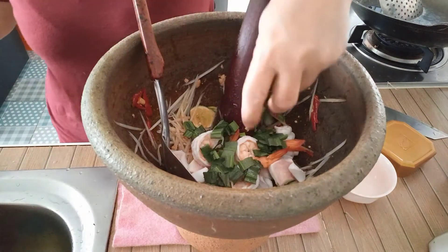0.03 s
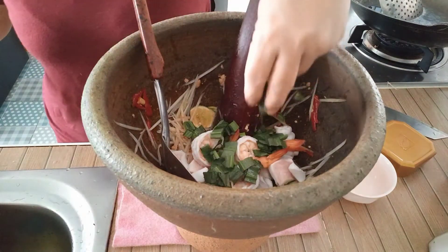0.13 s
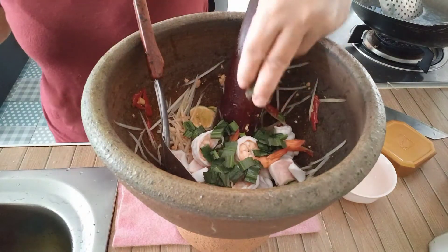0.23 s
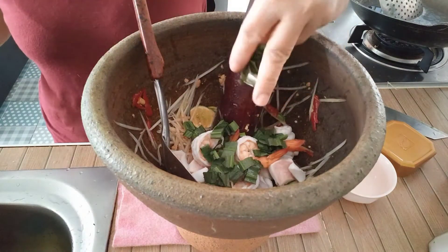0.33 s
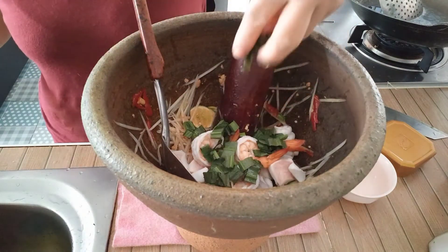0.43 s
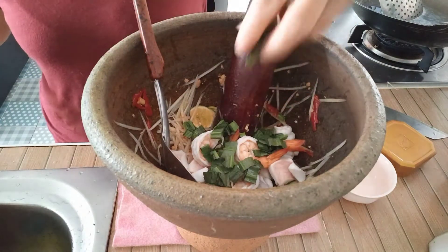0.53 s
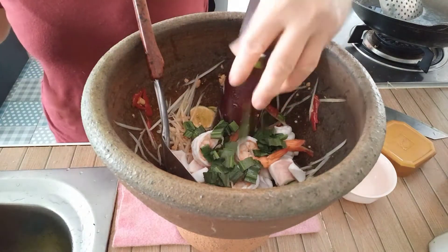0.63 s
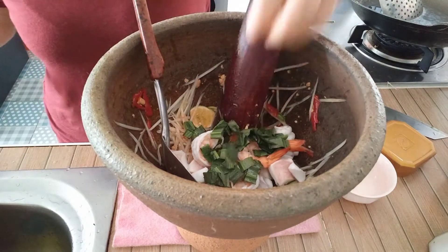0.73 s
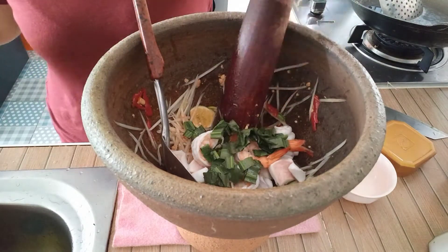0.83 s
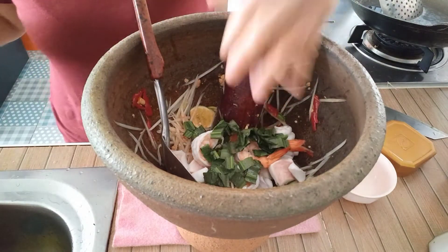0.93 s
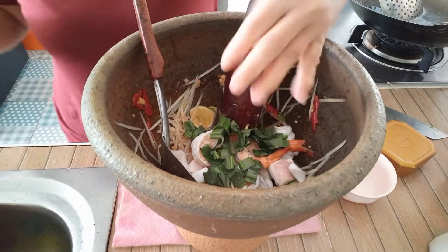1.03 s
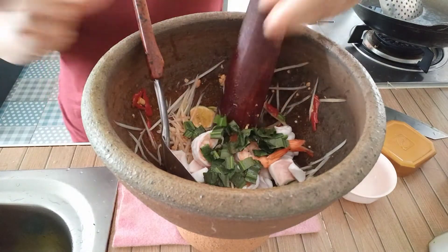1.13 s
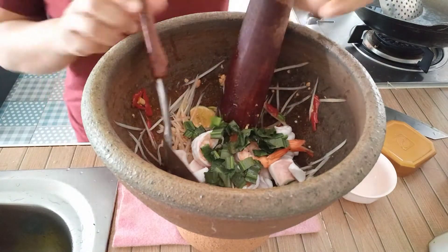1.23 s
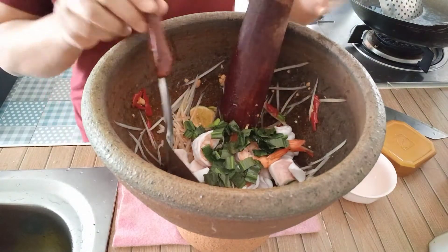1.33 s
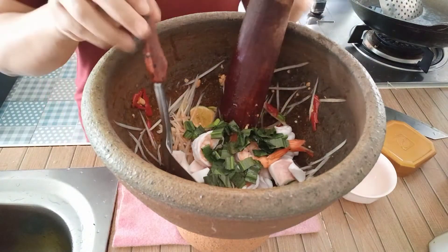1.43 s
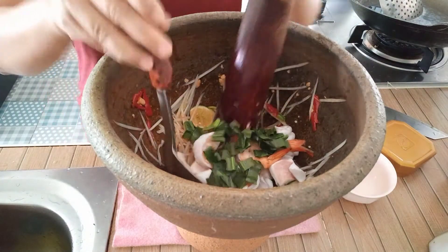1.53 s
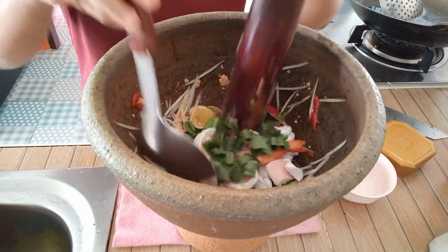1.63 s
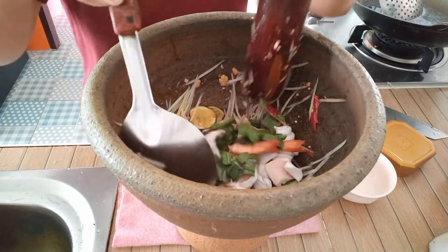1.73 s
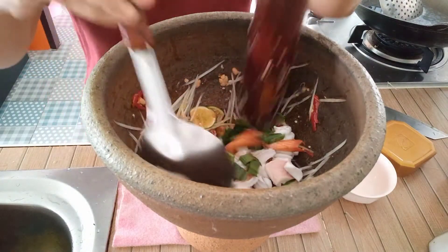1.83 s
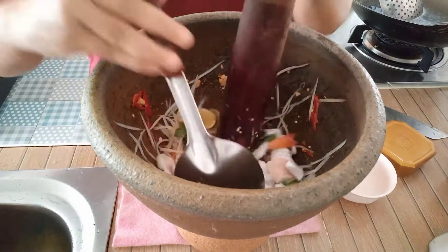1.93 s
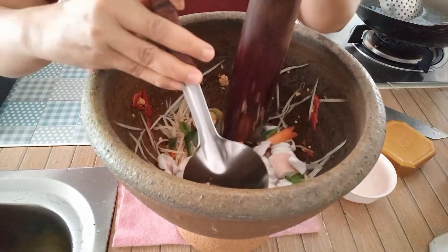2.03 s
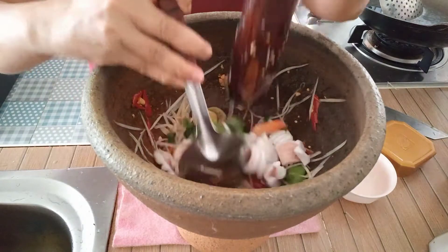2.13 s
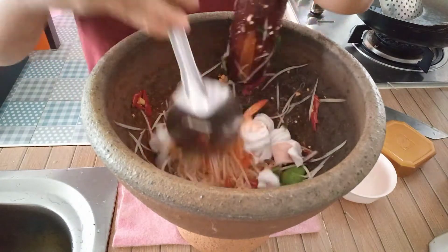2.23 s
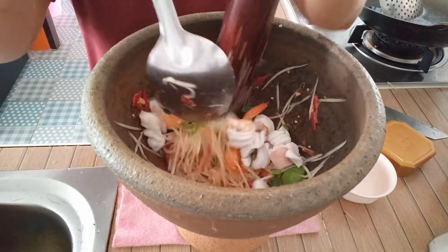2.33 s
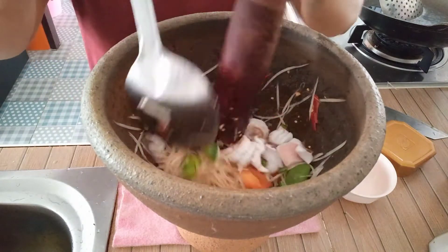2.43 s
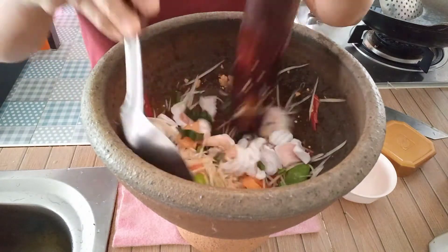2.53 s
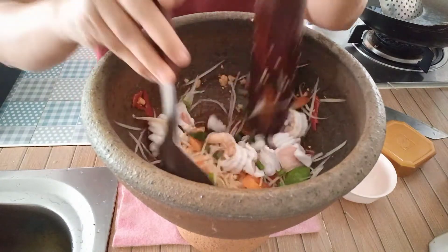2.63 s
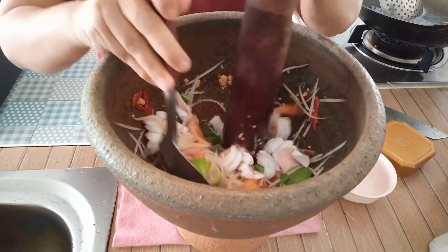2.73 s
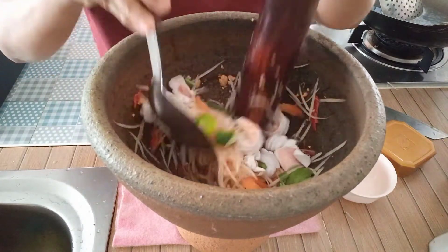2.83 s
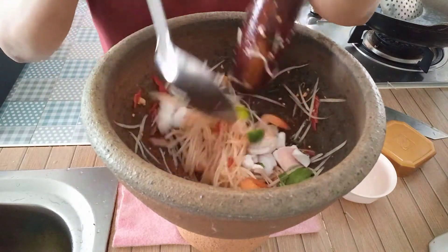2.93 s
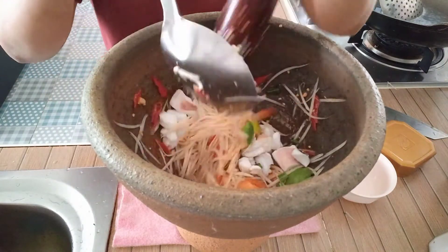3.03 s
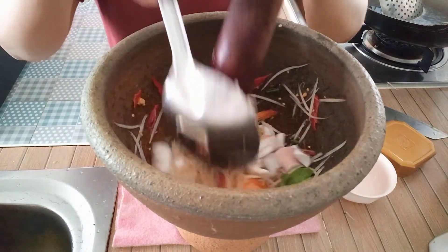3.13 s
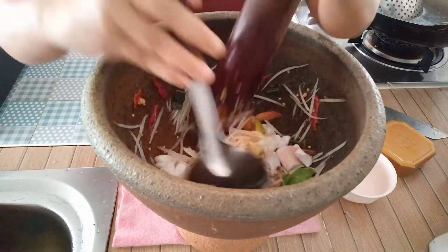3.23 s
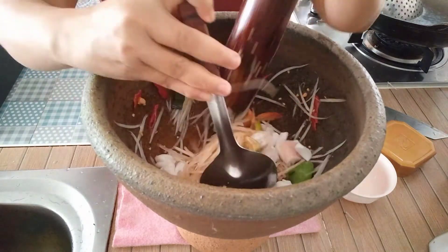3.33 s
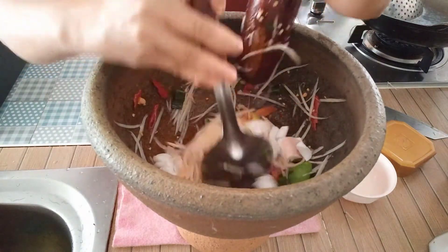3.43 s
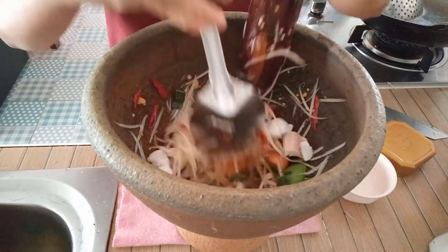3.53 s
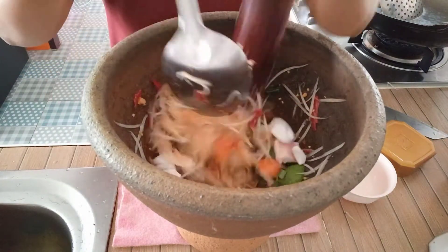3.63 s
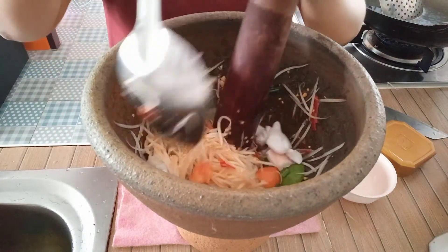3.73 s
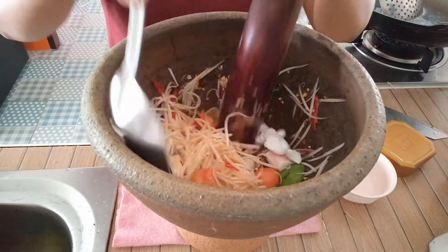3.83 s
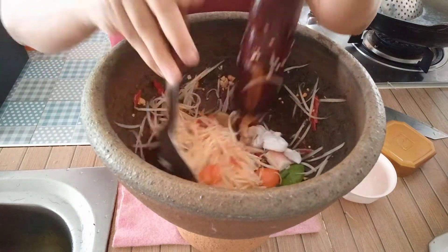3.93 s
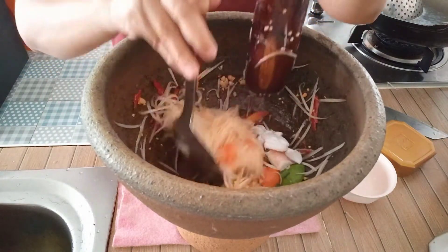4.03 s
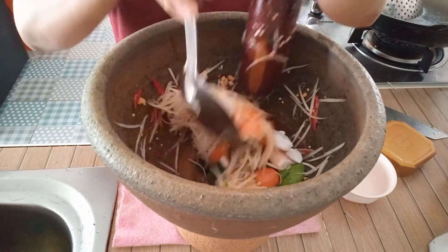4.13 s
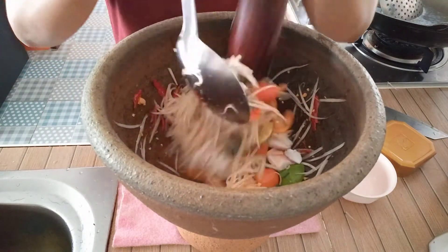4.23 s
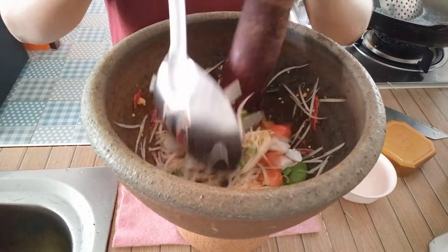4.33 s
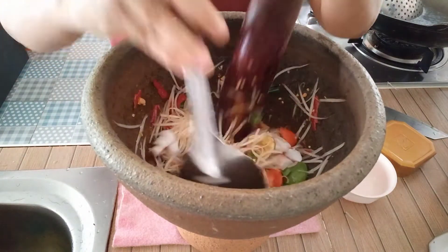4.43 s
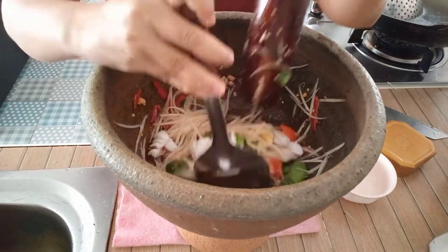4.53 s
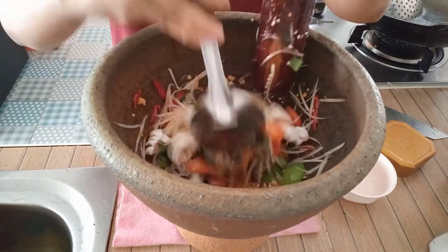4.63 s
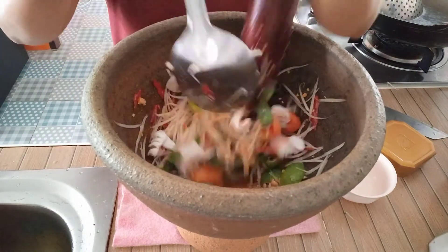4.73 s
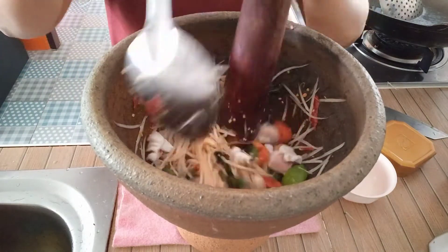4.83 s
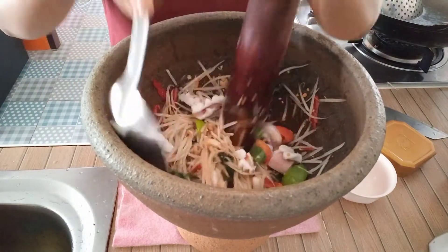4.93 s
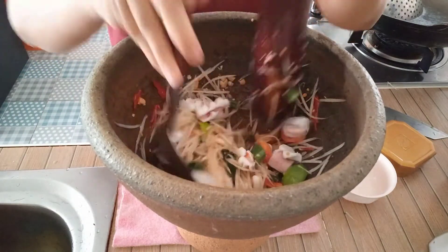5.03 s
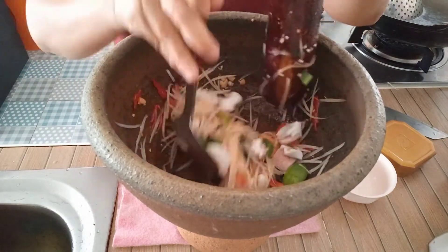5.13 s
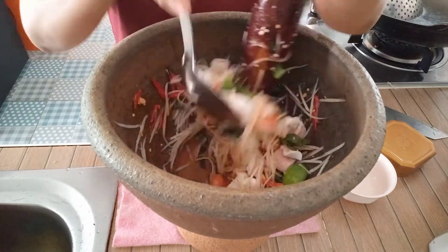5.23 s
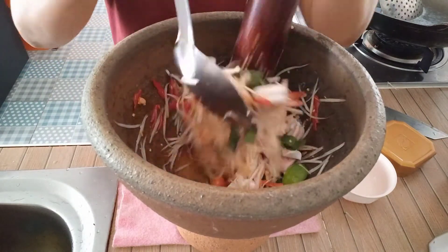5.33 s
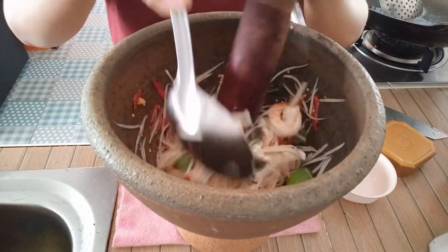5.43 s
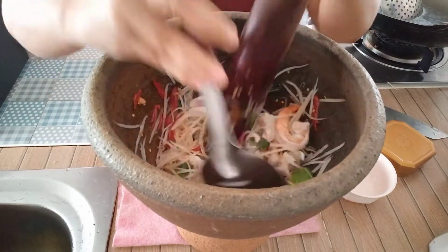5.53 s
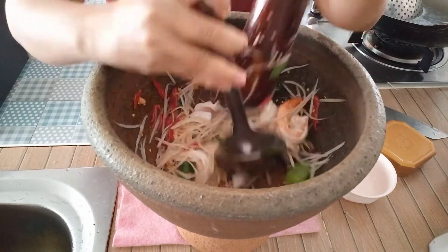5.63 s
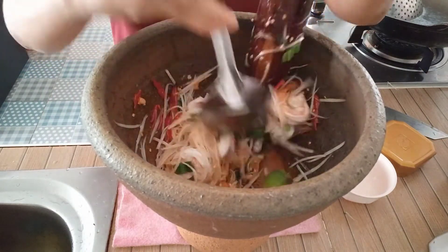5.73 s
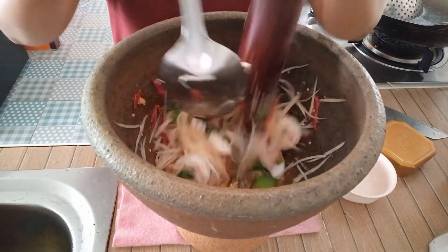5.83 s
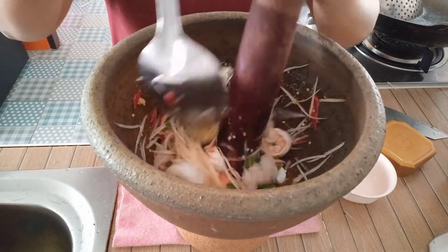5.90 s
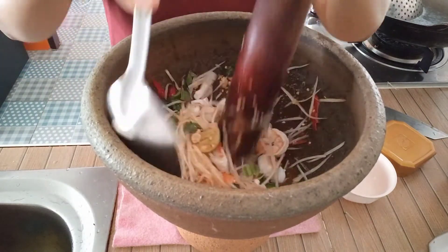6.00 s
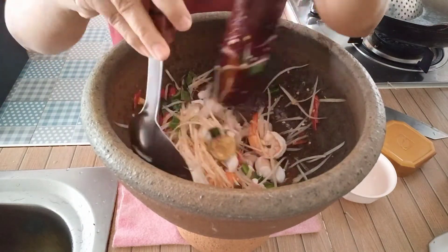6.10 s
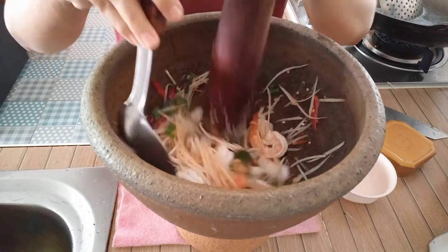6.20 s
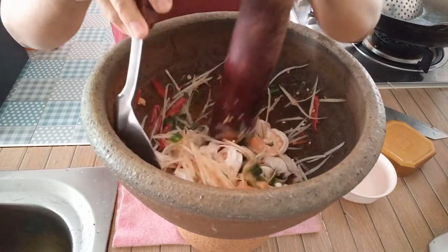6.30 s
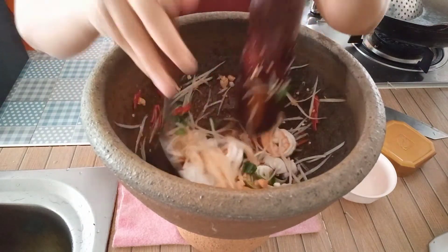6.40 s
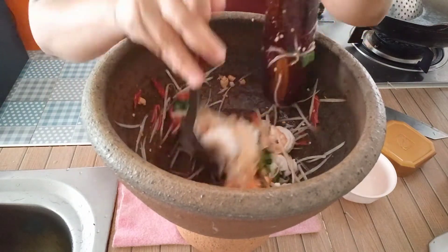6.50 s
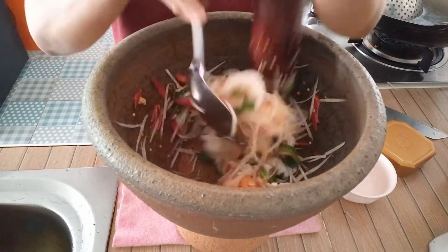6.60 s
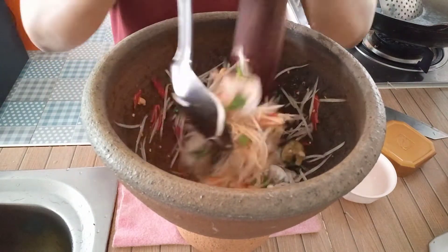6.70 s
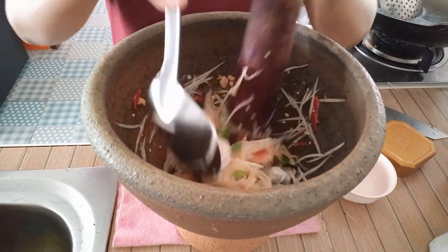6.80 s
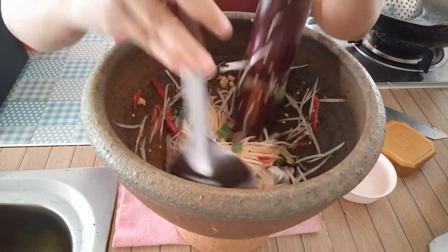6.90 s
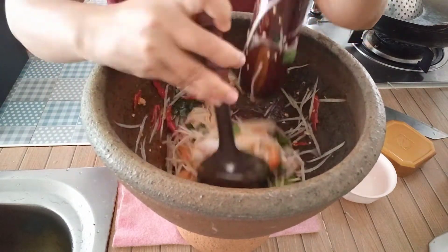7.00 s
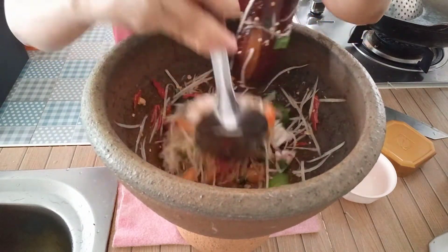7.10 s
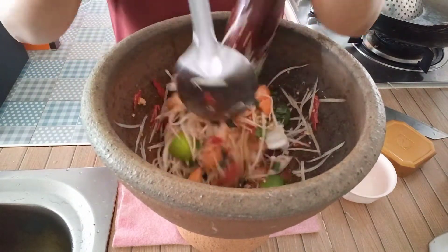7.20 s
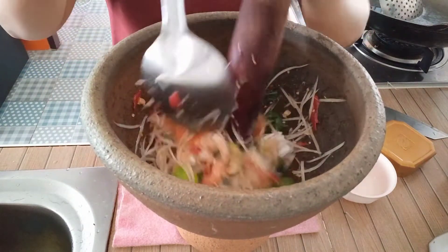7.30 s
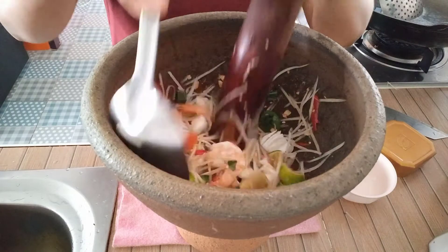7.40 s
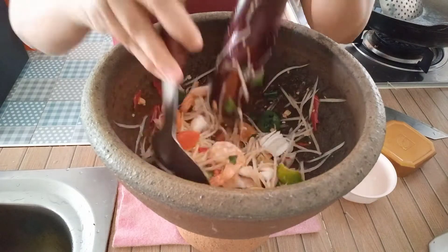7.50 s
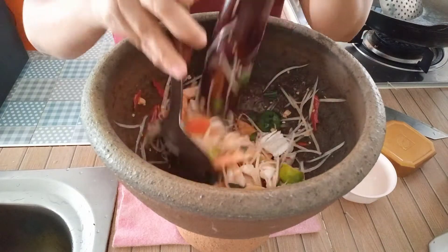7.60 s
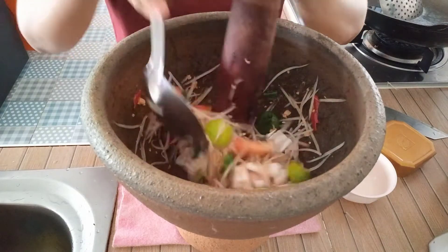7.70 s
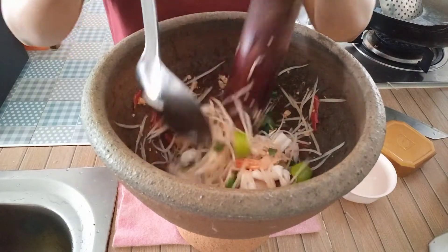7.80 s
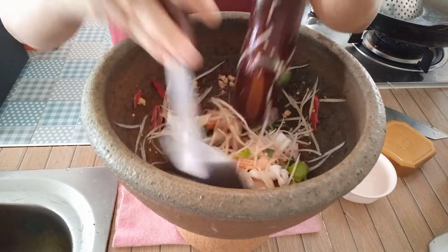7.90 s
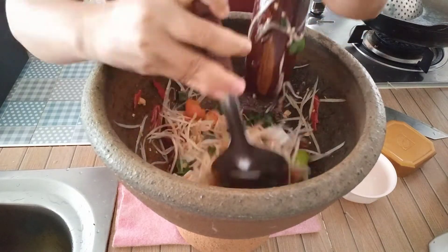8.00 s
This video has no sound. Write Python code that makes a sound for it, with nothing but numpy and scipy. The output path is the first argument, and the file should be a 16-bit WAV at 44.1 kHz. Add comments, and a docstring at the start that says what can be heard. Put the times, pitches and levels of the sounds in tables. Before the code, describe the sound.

Close, quick salad pounding: dull wooden blows, hollow clay ring, bright spoon clinks, gritty scrapes and moist squelches, after a few distant knocks.

```python
"""Dull wooden thuds and a ringing clay bowl, close by: a salad is mixed in a big mortar in a small kitchen.
The pestle lands as filtered bursts of echoes and the bowl rings in paired modes; between blows a steel spoon
clinks, scrapes in stick-slip grains and turns the food over, which crackles and squelches. The counter booms
underneath as swelling low noise. At the start something knocks farther off; faint whistles glide far away."""
import sys
import numpy as np
from scipy import signal
from scipy.fft import rfft, irfft
from scipy.io import wavfile
from scipy.ndimage import uniform_filter1d

SR = 44100
rng = np.random.default_rng(int(sys.argv[2]) if len(sys.argv) > 2 else 0)


def int16_out(signal):
    """Quantize to a 16-bit WAV file."""
    q = np.round(np.clip(np.atleast_2d(signal).T, -1, 1) * 32767)
    wavfile.write(sys.argv[1], SR, q.astype(np.int16))


N = 355181
TAIL = SR // 3   # longest response in samples

# Pestle blows. Each row: start in seconds, bowl ring in dB, thud in dB.
BLOWS = [(2.257, -57.5, -60), (2.352, -31.5, -29), (2.366, -35.5, -31.5), (2.625, -33, -25.5),
         (2.66, -40, -24.5), (3.039, -34.5, -40), (3.081, -26, -25.5), (3.143, -34, -23),
         (3.432, -74, -57.5), (3.582, -56.5, -47), (4.143, -50.5, -61), (4.173, -44.5, -42),
         (4.634, -29.5, -39), (4.676, -37.5, -36.5), (4.897, -38, -30), (5.214, -35.5, -43),
         (5.245, -49, -43), (5.32, -25, -26.5), (5.357, -28.5, -28.5), (5.491, -51, -33.5),
         (5.732, -28, -35.5), (6.368, -49, -45.5), (6.538, -14, -28), (7.166, -54.5, -55)]
# The spoon meets the wall. Each row: start in seconds, bowl ring in dB, force in dB before colouring,
# blade pitch in Hz, chatter t60 in seconds.
CLINKS = [(1.013, -79.5, -71.5, 2470, 0.063), (1.289, -83.5, -70, 2940, 0.13),
          (1.745, -40.5, -32, 1666, 0.052), (1.762, -38.5, -34.5, 1630, 0.049),
          (1.959, -42, -39, 1645, 0.21), (2.256, -67.5, -51.5, 2940, .14), (2.5, -27.5, -18, 5050, 0.034),
          (2.968, -86, -58.5, 6530, .06), (3.432, -51, -51.5, 3780, 0.054),
          (3.772, -36.5, -17.5, 5370, 0.04), (3.787, -27.5, -19.5, 2960, 0.083),
          (3.847, -34.5, -16.5, 2673, 0.052), (4.19, -60, -42.5, 5420, 0.1), (4.248, -71, -40, 1360, .05),
          (4.402, -38, -19, 2555, 0.068), (4.877, -27.5, -18.5, 2980, 0.084),
          (4.933, -55, -19, 4760, 0.078), (4.942, -32.5, -17, 4930, .05), (5.038, -64, -18.5, 1950, 0.048),
          (5.491, -55, -24, 2530, 0.057), (5.99, -28.5, -24, 3770, .08), (6.152, -55, -42.5, 3190, 0.05),
          (7.395, -36, -24.5, 3880, 0.042), (7.506, -67, -24.5, 1637, 0.028), (7.897, -40, -26, 2370, 0.21),
          (7.914, -38, -23.5, 6680, 0.076), (7.946, -45, -15, 2654, 0.057)]
# The spoon drags over the clay. Each row: start in seconds, length in seconds,
# force in dB before colouring, blade pitch in Hz.
SCRAPES = [(1.771, 0.089, -38.5, 4640), (1.862, .06, -38.5, 1830), (1.955, 0.017, -33, 1677),
           (2.031, 0.021, -32.5, 2610), (2.045, 0.036, -29, 4210), (2.502, 0.033, -20.5, 4850),
           (2.542, 0.021, -27, 2910), (2.558, 0.056, -20, 2696), (2.611, 0.025, -18, 1635),
           (2.64, 0.034, -28, 1560), (2.669, .04, -37.5, 2065), (3.792, 0.021, -26, 1640),
           (4.885, 0.059, -33.5, 2870), (4.946, 0.05, -17, 2920), (4.99, .038, -24.5, 1950),
           (5.996, 0.047, -21.5, 2910), (6.04, 0.0392, -34.5, 1606), (6.207, 0.062, -32.5, 1560),
           (6.336, 0.057, -41, 1533), (6.396, 0.021, -28.5, 4610), (7.392, 0.044, -25, 3280),
           (7.442, 0.029, -21.5, 4560), (7.454, .025, -23, 1623), (7.494, 0.021, -29, 1660),
           (7.944, .03, -21, 1986)]
# Wet food is pressed or turned. Each row: start in seconds, length in seconds, squelch in dB,
# hiss in dB, counter boom in dB.
PUSHES = [(1.274, 0.08, -69, -65, -76.5), (1.415, 0.18, -71.5, -62.5, -80), (1.76, 0.25, -46, -41.5, -52.5),
          (2.316, 0.12, -36.5, -35.5, -33), (2.65, 0.18, -48.5, -47.5, -46.5),
          (3.062, .13, -38, -36.5, -37), (3.213, 0.11, -51.5, -45, -57), (3.569, .16, -33.5, -32, -39),
          (4.174, .14, -37, -41, -40), (4.415, 0.11, -31, -30, -47), (4.69, .17, -35, -38.5, -36),
          (5.225, 0.1, -58, -50, -49), (5.317, 0.12, -37.5, -37.5, -36), (5.5, 0.13, -39.5, -39.5, -45),
          (5.773, 0.13, -34.5, -38, -48), (6.116, 0.14, -44.5, -41, -60.5), (6.255, 0.1, -41, -78, -56.5),
          (6.408, 0.1, -43, -44.5, -54), (6.57, 0.083, -50, -44.5, -53), (6.63, 0.11, -37, -40, -45.5),
          (6.855, .13, -53.5, -41.5, -55), (6.958, 0.077, -51.5, -50.5, -56), (7.174, .17, -38, -39, -50.5),
          (7.62, 0.089, -34.5, -38, -58)]
# Something is set down farther off. Each row: start in seconds, level in dB before colouring,
# brightness in dB per band.
KNOCKS = [(0.153, -31, 0.5), (.347, -19, -1), (0.526, -40.5, -1), (.575, -27, -2.5), (0.614, -32.5, -2.5),
          (.651, -35, -5.5), (.674, -62, -6.5)]
# Smooth spectrum of spoon and wall. Each row: frequency in Hz, level in dB.
SPOON_SPECTRUM = [(100, -28.5), (280, -8), (500, -5.5), (1200, -5.5), (2000, -1), (2700, 3), (4500, 3),
                  (6600, -1.5), (7600, -13.5), (8800, -10.5), (12000, -7.5), (16000, -14.5)]
# Resonances of spoon and wall. Each row: frequency in Hz, width in Hz, height in dB.
SPOON_PEAKS = [(477.5, 32, 13.6), (744, 13, 15), (976, 89, 14.4), (1509, 130, 7.9), (1599, 43, 17),
               (1972, 29, 8.7), (2380, 9.9, 3.6), (2480, 54, 2.7), (2650, 17, 1.7), (2944, 33, 6),
               (3560, 11, 1.3), (3720, 9.7, 3.2), (4570, 120, 5.9), (4680, 15, 4), (6430, 810, 1.1)]
# Low, mid, high and top band of a contact. Each row: lower edge in Hz, upper edge in Hz.
BANDS_HZ = [(40, 760), (760, 2300), (2300, 7200), (7200, 19000)]


def from_db(db):
    """Turn decibels into an amplitude factor."""
    return 10 ** (np.asarray(db) / 20)


def dying(t60):
    """Envelope that falls 60 dB in t60 seconds."""
    return from_db(-60 * np.arange(TAIL) / SR / t60)


def cut(x, hz, kind, order=4):
    """Butterworth filter."""
    return signal.sosfilt(signal.butter(order, hz, kind, fs=SR, output="sos"), x)


def resonate(x, hz, width_hz):
    """Pass a signal through one narrow resonance."""
    b, a = signal.iirpeak(hz, hz / width_hz, fs=SR)
    return signal.lfilter(b, a, x)


def convolve(x, response):
    """Pass a signal through a mono or stereo response."""
    return signal.fftconvolve(np.atleast_2d(x), response, axes=1)


def add(out, s, x):
    """Mix a sound in at time s in seconds."""
    at = round(s * SR)
    out[:, at:at + x.shape[1]] += x[:, :max(N - at, 0)]


def at_level(x, db):
    """Scale a sound so that its loudest hundredth of a second has this rms level."""
    power = uniform_filter1d(np.mean(x ** 2, axis=0), SR // 100)
    return x * from_db(db) / np.sqrt(power.max() + 1e-20)


def stereo_noise(size, alike):
    """Two white noises with a common part; alike is their correlation."""
    mid, side = rng.standard_normal((2, size))
    common = np.sqrt(1 + alike) * mid
    opposite = np.sqrt(1 - alike) * side * [[1], [-1]]
    return (common + opposite) / np.sqrt(2)


def body(spectrum, peaks=(), size=4096):
    """Causal (minimum-phase) impulse response of a smooth spectrum with resonances on top."""
    hz = np.maximum(np.fft.rfftfreq(size, 1 / SR), 1)
    points, db = np.transpose(spectrum)
    smooth = from_db(np.interp(np.log(hz), np.log(points), db))
    lift = 1 + sum(from_db(height) ** 2 / (1 + (2 * (hz - centre) / width) ** 2)
                   for centre, width, height in peaks)
    # folding the cepstrum forward makes the response causal
    cepstrum = irfft(np.log(smooth * np.sqrt(lift)))
    cepstrum[1:size // 2] *= 2
    cepstrum[size // 2 + 1:] = 0
    return irfft(np.exp(rfft(cepstrum)))[None]


def scatter(t60, direct_db, alike):
    """A direct click, right ear first, with dense reflections of unit energy."""
    ear_lag = 6   # samples
    echoes = stereo_noise(TAIL, alike) * dying(t60)
    echoes /= np.sqrt(np.sum(echoes ** 2) / 2)
    echoes[[0, 1], [ear_lag, 0]] += from_db(direct_db)
    return echoes


def voiced(x, levels_db):
    """Each contact weights the low, mid, high and top bands in its own way."""
    return sum(at_level(cut(x, band, "band", order=3), db) for band, db in zip(BANDS_HZ, levels_db))


def grains(size, per_s, spread_db):
    """Random clicks of uneven strength and sign."""
    out = np.zeros(size)
    at, strength, sign = rng.random((round(size * per_s / SR), 3)).T
    loudness = from_db(-spread_db * np.log(np.maximum(strength, .02)))
    out[(at * size).astype(int)] = loudness * np.sign(sign - .5)
    return out


def steady(spectrum, alike, peaks=()):
    """Coloured stereo noise, rms 1."""
    x = convolve(stereo_noise(N + TAIL, alike), body(spectrum, peaks))[:, TAIL:TAIL + N]
    return x / x.std()


def aftermath(jolts, rise_s, t60):
    """Power that swells and dies away after each jolt, given as start in seconds and peak in dB."""
    out, t = np.zeros((1, N)), np.arange(SR) / SR
    shape = (1 - np.exp(-t / rise_s)) * np.exp(-np.log(1000) * t / t60)
    for s, db in jolts:
        add(out, s, (from_db(db) * shape[None] / shape.max()) ** 2)
    return out[0]


def pestle(thud_db=0, clack_db=-5, clack_follows_ring=0.51):
    """Wood lands on food and clay: a dull thud and a short clack, more clack when the clay rings more."""
    # Plain colour of wood on food. Each row: frequency in Hz, level in dB.
    thud_spectrum = [(60, -27.5), (120, -6), (190, -8.5), (300, -8), (600, 1), (1100, -2), (1400, -16),
                     (2500, -22.5), (6000, -33), (16000, -53.5)]
    # Resonances of the thud. Each row: frequency in Hz, width in Hz, height in dB.
    thud_peaks = [(284.7, 30, 16.5), (393, 16, 9), (475.7, 32, 14.5), (530, 19, 11), (1020, 32, 7)]
    out, wood = np.zeros((2, N)), body(thud_spectrum, thud_peaks)
    for s, ring, thud in BLOWS:
        low = convolve(scatter(t60=0.12, direct_db=-6.5, alike=0.92), wood)
        high = convolve(scatter(t60=0.09, direct_db=-12.5, alike=0.29), wood)
        clack = thud + clack_db + clack_follows_ring * (ring - thud)
        add(out, s, at_level(cut(low, 810, "low"), thud + thud_db))
        add(out, s, at_level(cut(high, 880, "high"), clack))
    return out


def ringing(pestle_db=0, spoon_db=0):
    """The clay rings after every blow: dull under wood, bright under steel."""
    out = np.zeros((2, N))
    dull = bowl(pestle_db, contact_hz=1480, rise_s=0.0077)
    bright = bowl(spoon_db, contact_hz=5500, rise_s=0.0039)
    for table, ring in (BLOWS, dull), (CLINKS, bright):
        for s, ring_db, *_ in table:
            add(out, s, from_db(ring_db) * ring)
    return out


def bowl(ring_db, contact_hz, rise_s, split_hz=11, swell_db=4, opposed=0.58, right_lag_rad=1.4):
    """Each wall mode is a close pair that starts opposed, so the ring swells, dips and returns faintly."""
    # Wall modes of the mortar. Each row: frequency in Hz, relative level in dB, t60 in seconds,
    # right ear gain in dB.
    bowl_modes = [(737, 12.5, 0.17, 0.5), (1668, -7.5, 0.17, -2), (2540, -12.5, 0.15, -5.5),
                  (2960, -5.5, .2, -4.5), (3690, -13.5, .15, -2.5), (4520, -17, .16, -6),
                  (4875, -9, 0.17, -5)]
    t, out = np.arange(TAIL) / SR, 0
    for hz, db, t60, right_db in bowl_modes:
        lower = np.exp(2j * np.pi * hz * t)
        upper = np.exp(2j * np.pi * (hz + split_hz) * t)
        left = from_db(swell_db) * (lower - opposed * upper)
        right = from_db(right_db) * (lower - 0.27 * upper) * np.exp(-1j * right_lag_rad)
        softness = 1 + (hz / contact_hz) ** 4   # a soft contact spares the high modes
        out = out + np.imag([left, right]) * dying(t60) * from_db(db) / softness
    return at_level(out * (1 - np.exp(-t / rise_s)), ring_db)


def clinks(level_db=-1, settle_s=0.0013, ting_db=-7, wall_hz=2900, coupling_db=6, clay_share=0.51):
    """The steel edge lands, chatters briefly and rings; the lows partly follow the bowl's ring."""
    # Clink colour for the low, mid, high and top band. Each row: level in dB,
    # dB more per octave of blade pitch, dB more per dB of force.
    clink_colour = [(-5.5, -2, 0), (-6, -8, 0.04), (1, 2, 0.0344), (-4, 4, -0.15)]
    out, steel = np.zeros((2, N)), body(SPOON_SPECTRUM, SPOON_PEAKS)
    landing = 1 - np.exp(-np.arange(TAIL // 3) / SR / settle_s)
    for s, ring, db, hz, chatter in CLINKS:
        force = scatter(t60=chatter, direct_db=-7, alike=0.072)[:, :len(landing)] * landing
        clay = [clay_share * (ring - db), 0, 0, 0]
        levels = level_db + spoon_colour(clink_colour, hz, db) + clay
        add(out, s, voiced(blade(force, steel, hz, width_hz=110, lift_db=13.5), levels))
        coupling = 1 / (1 + ((hz - wall_hz) / 220) ** 2)   # a pitch near the wall's bright mode rings louder
        add(out, s, ting(hz, db + ting_db + coupling_db * coupling))
    return out


def blade(force, steel, hz, width_hz, lift_db, overtones=((1.4, -4), (1.98, -7))):
    """Spoon and wall answer a force; where the edge touches sets the pitch. Overtones: ratio, dB."""
    x = out = convolve(force, steel)
    for ratio, db in ((1, 0), *overtones):
        out = out + from_db(lift_db + db) * resonate(x, hz * ratio, width_hz)
    return out


def ting(hz, db, t60=0.036, partials=((1, 0), (1.4, -6), (1.98, -9))):
    """The blade rings briefly and cleanly at its pitch. Partials: ratio, dB."""
    t = np.arange(TAIL // 3) / SR
    tones = sum(from_db(gain) * np.sin(2 * np.pi * (hz * ratio * t + rng.random((2, 1))))
                for ratio, gain in partials)
    onset = 1 - np.exp(-t / 0.0014)
    return at_level(tones * dying(t60)[:len(t)] * onset, db)


def spoon_colour(colour, hz, force_db, blade_hz=2690, firm_db=-25):
    """Band levels of a contact, shifted by pitch and force from a middling blade_hz and firm_db."""
    db, per_octave, per_db = np.transpose(colour)
    return force_db + db + per_octave * np.log2(hz / blade_hz) + per_db * (force_db - firm_db)


def scrapes(level_db=0, grit_db=-15, sing_db=-11):
    """The edge sticks and slips over gritty clay; slips echo round the bowl and the blade sings."""
    # Scrape colour for the low, mid, high and top band. Each row: level in dB,
    # dB more per octave of blade pitch, dB more per dB of force.
    scrape_colour = [(-15, 0.87, 0.17), (-4.5, -2.7, -0.1), (1, 1, .03), (-5, 0.87, -0.13)]
    out, steel = np.zeros((2, N)), body(SPOON_SPECTRUM, SPOON_PEAKS)
    for s, length, db, hz in SCRAPES:
        size = round(length * SR)
        slips = grains(size, per_s=600, spread_db=2.5) + from_db(grit_db) * rng.standard_normal(size)
        echoes = scatter(t60=0.036, direct_db=-11.5, alike=0.0)[:, :TAIL // 3]
        force = convolve(slips * signal.windows.tukey(size, .25), echoes)
        levels = level_db + spoon_colour(scrape_colour, hz, db)
        add(out, s, voiced(blade(force, steel, hz, width_hz=40, lift_db=7.0), levels))
        add(out, s, at_level(resonate(force, hz, width_hz=45), db + sing_db))
    return out


def food(level_db=0, sharpness=(1.9, 1.5, 1.1), peak_share=0.7, spray_db=-9):
    """A push starts as a thin hiss and deepens to a squelch where the food gives way, late in the push."""
    out = np.zeros((2, N))
    for start, length, squelch, hiss, _ in PUSHES:
        t = np.arange(start - .02, start + length + 0.0061, 1 / SR)
        push = np.interp(t, [t[0], start + peak_share * length, t[-1]], [0, 1, 0])
        snaps = crackle(len(t), per_s=2500)
        # mid, high and top: the lower the band, the more it gathers at the peak
        for band, db, power in zip(BANDS_HZ[1:], (squelch, hiss, hiss + spray_db), sharpness):
            add(out, t[0], at_level(cut(snaps, band, "band", order=3) * push ** power, db + level_db))
    return out


def crackle(size, per_s, pops_db=6):
    """Shreds snap in a dense crowd inside the bowl, with wet pops among them."""
    # Plain colour of the food. Each row: frequency in Hz, level in dB.
    food_spectrum = [(150, 2), (450, 6), (1000, -5.5), (2000, -5.5), (4000, -1), (6700, -7.5), (7600, -23),
                     (9000, -14), (16000, -16.5)]
    # Resonances of the food. Each row: frequency in Hz, width in Hz, height in dB.
    food_peaks = [(753, 14, 4), (925, 54, 2), (1600, 180, 7.6), (2250, 860, 0.69)]
    force = grains(size, per_s, spread_db=1) + from_db(pops_db) * pops(size)
    snaps = convolve(force, scatter(t60=.03, direct_db=1, alike=.05))
    return convolve(snaps, body(food_spectrum, food_peaks))[:, :size]


def pops(size, per_s=30, cycles=8, count=14):
    """Tiny juice bubbles burst, each ringing a few cycles at one of a set of pitches."""
    out = 0
    for hz in np.geomspace(850, 6500, count):
        bursts = grains(size, per_s, spread_db=3) + 1e-18   # the offset keeps the filter off denormals
        out = out + resonate(bursts, hz, width_hz=hz / cycles)
    return out


def rustle(push_db=6, rise_s=.015, settle_db=-27.5, settle_t60_s=0.34, tossing_from_s=1.75, rustle_db=-69):
    """Loose shreds keep shifting once the tossing has begun, most of all just after they were moved."""
    moved = [(s + length / 2, db) for s, length, db, _ in SCRAPES]
    moved += [(s + length / 2, hiss + push_db) for s, length, _, hiss, _ in PUSHES]
    power = from_db(settle_db) ** 2 * aftermath(moved, rise_s, settle_t60_s)
    power += from_db(rustle_db) ** 2 * (np.arange(N) / SR > tossing_from_s)
    shreds = cut(crackle(N, per_s=970), 1100, "high", order=1)
    return shreds / shreds.std() * np.sqrt(power)


def counter(blow_db=-15, clink_db=-31, knock_db=-22, push_db=0, lean_s=0.052, lowest_hz=68):
    """The counter booms near 100 Hz: after every jolt, and for as long as a push leans on the mortar."""
    # Plain colour of the counter. Each row: frequency in Hz, level in dB.
    boom_spectrum = [(25, -32), (50, -16), (78, 0), (92, -2), (105, -0.5), (135, -13), (165, -16.5),
                     (220, -21.5), (500, -44.5), (2000, -91)]
    # The counter's own note. Each row: frequency in Hz, width in Hz, height in dB.
    boom_peaks = [(104.9, 3.8, 3.5)]
    jolts = [(s, thud + blow_db) for s, _, thud in BLOWS]
    jolts += [(s, db + clink_db) for s, _, db, *_ in CLINKS]
    jolts += [(s, db + knock_db) for s, db, _ in KNOCKS]
    power = aftermath(jolts, rise_s=0.023, t60=0.45)[None]
    for start, length, *_, db in PUSHES:
        lean = np.hanning(round((length + 2 * lean_s) * SR))
        add(power, start - lean_s, (from_db(db + push_db) * lean[None]) ** 2)
    boom = steady(boom_spectrum, alike=0.9, peaks=boom_peaks)
    own_power = uniform_filter1d(np.mean(boom ** 2, axis=0), SR // 20)   # divided out to steady the noise
    return cut(boom * np.sqrt(power / own_power), lowest_hz, "high", order=2)


def knocks(level_db=0):
    """Hollow, rattling knocks from farther off, mostly heard by way of the walls."""
    # Plain colour of the knocks. Each row: frequency in Hz, level in dB.
    knock_spectrum = [(60, -14.5), (180, -9), (290, -3), (550, -0.5), (850, -3.5), (1200, -3.5), (2000, -8),
                      (3500, 4), (6600, -7.5), (7600, -27.5), (10000, -22), (16000, -27)]
    # Resonances of the knocks. Each row: frequency in Hz, width in Hz, height in dB.
    knock_peaks = [(289.5, 18, 13), (366, 12, 13), (484.6, 24, 14), (944, 11, 7.4), (1393, 27, 13),
                   (1545, 12, 12), (1710, 130, 15), (2070, 140, 15)]
    # Offsets in dB of the low, mid, high and top band.
    knock_colour_db = np.array((-3, 0.5, 1.5, -1))
    out, hollow = np.zeros((2, N)), body(knock_spectrum, knock_peaks)
    for s, db, brightness in KNOCKS:
        lows = cut(scatter(t60=0.26, direct_db=-27, alike=.9), 700, "low")
        highs = cut(scatter(t60=0.26, direct_db=-24.5, alike=.05) * rattle(), 700, "high")
        tilt = brightness * (np.arange(len(BANDS_HZ)) - 1)
        levels = db + level_db + tilt + knock_colour_db
        add(out, s, voiced(convolve(lows + highs, hollow), levels))
    return out


def rattle(depth_db=4, per_s=160):
    """Uneven strength of a blow whose contact chatters."""
    knots = np.arange(TAIL) / SR * per_s
    return from_db(depth_db * np.interp(knots, np.arange(200), rng.standard_normal(200)))


def whistles(level_db=-1):
    """Thin gliding tones from far away, blurred by echoes."""
    # Faint far whistles. Each row: start in seconds, length in seconds, start pitch in Hz,
    # end pitch in Hz, level in dB before the common trim level_db.
    whistle_glides = [(0.844, 0.18, 793, 695, -72.5), (5.09, 0.24, 1310, 1447, -54),
                      (7.796, .26, 1164, 1317, -45)]
    out = np.zeros((2, N))
    for s, length, start_hz, end_hz, db in whistle_glides:
        hz = np.linspace(start_hz, end_hz, round(length * SR))
        tone = np.sin(2 * np.pi * np.cumsum(hz) / SR) * np.hanning(len(hz))
        echoes = scatter(t60=.25, direct_db=-6, alike=.3)
        add(out, s, at_level(convolve(tone, echoes), db + level_db))
    return out


def kitchen(x, t60=0.27, wet_db=-9.5, build_s=0.0079):
    """Hard walls: a short diffuse tail, alike in both ears in the bass."""
    tail = cut(stereo_noise(TAIL, 1.0), 340, "low") + cut(stereo_noise(TAIL, .05), 240, "high")
    tail *= dying(t60) * (1 - np.exp(-(np.arange(TAIL) / SR / build_s) ** 2))
    return from_db(wet_db) * convolve(x, tail / np.sqrt(np.sum(tail ** 2) / 2))[:, :N]


def hush(air_db=-70.5, rumble_db=-65.5):
    """The quiet of the room: a low rumble and faint air, alike in both ears in the lows, diffuse above."""
    # Colour of the room's air. Each row: frequency in Hz, level in dB.
    hush_spectrum = [(88, -31.5), (150, -16), (201, -6), (217, -2), (484, -19.5), (524, -5.5), (624, -15.5),
                     (689, -11), (759, -22.5), (854, -11.5), (2100, -35), (5150, -34), (6770, -14),
                     (8230, -35), (16000, -43)]
    # The building's low rumble. Each row: frequency in Hz, level in dB.
    rumble_spectrum = [(25, -17), (50, -7), (70, -1), (105, -4.5), (160, -14.5), (500, -48)]
    lows = cut(steady(hush_spectrum, alike=0.71), 570, "low")
    treble = cut(steady(hush_spectrum, alike=.15), 700, "high")
    rumble = steady(rumble_spectrum, alike=.9)
    return from_db(air_db) * (lows + treble) + from_db(rumble_db) * rumble


def scene(spoon_pan_db=0.5, ring_room_db=-7):
    """The spoon works a little to the left of the pestle; the bowl is so close that its ring is nearly dry."""
    spoon = (clinks() + scrapes()) * from_db([[spoon_pan_db], [-spoon_pan_db]])
    contacts = pestle() + spoon + food() + rustle() + knocks() + whistles()
    ring = ringing()
    room = kitchen(contacts + from_db(ring_room_db) * ring)
    return contacts + ring + room + counter() + hush()


def record(dry, cutoff_hz=16000):
    """The top is cut steeply by an elliptic low-pass."""
    return signal.sosfilt(signal.ellip(10, .2, 70, cutoff_hz, fs=SR, output="sos"), dry)


dry = scene()
out = record(dry)
int16_out(out)
```